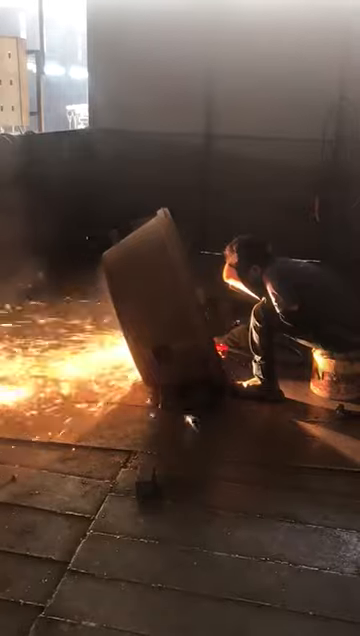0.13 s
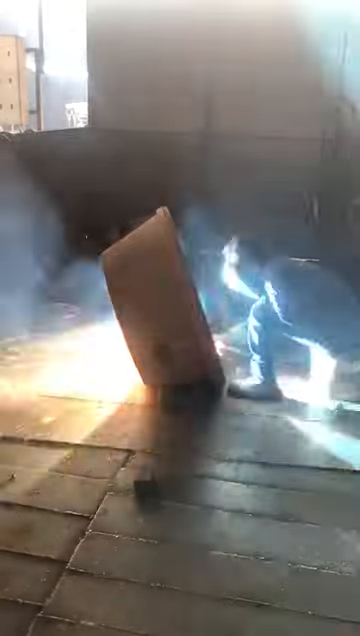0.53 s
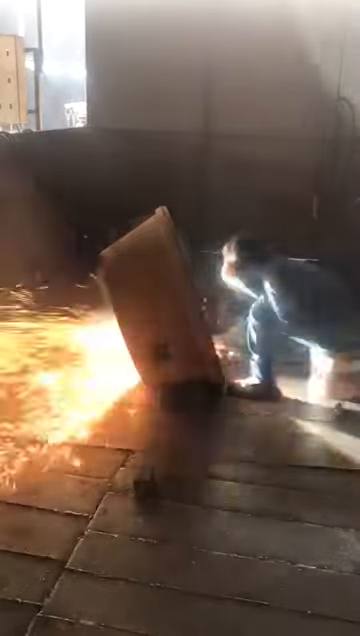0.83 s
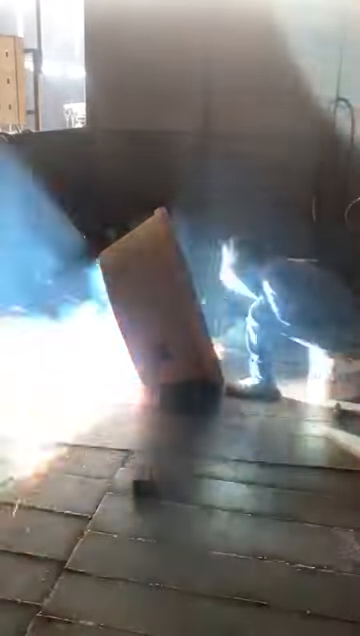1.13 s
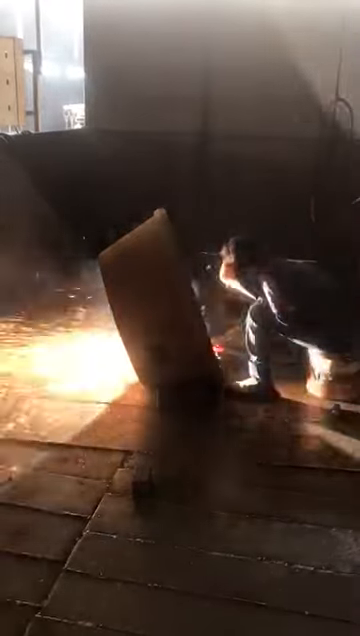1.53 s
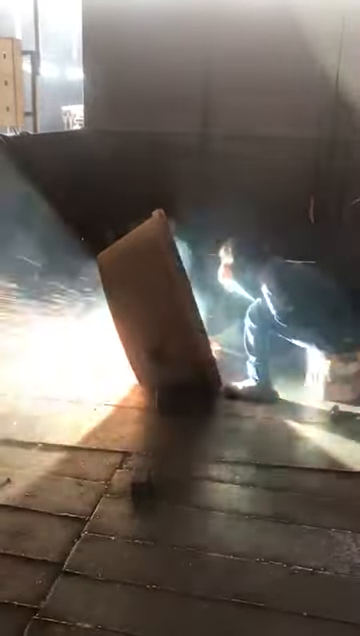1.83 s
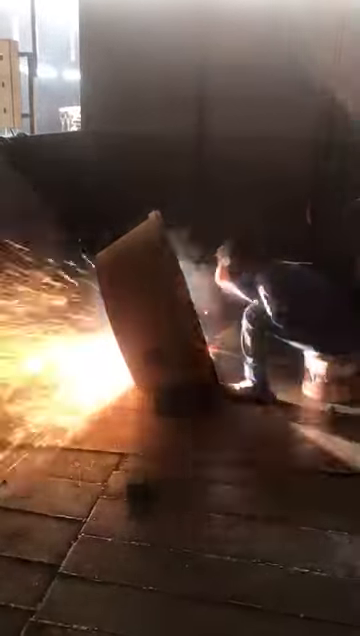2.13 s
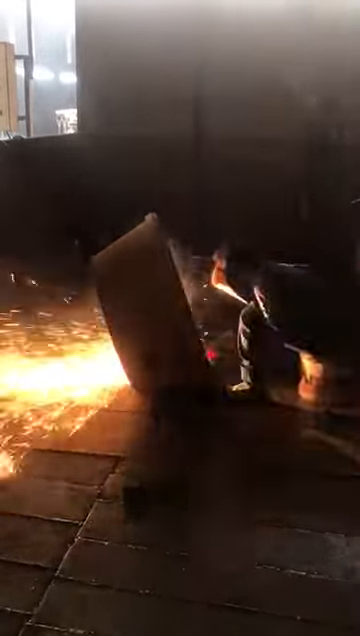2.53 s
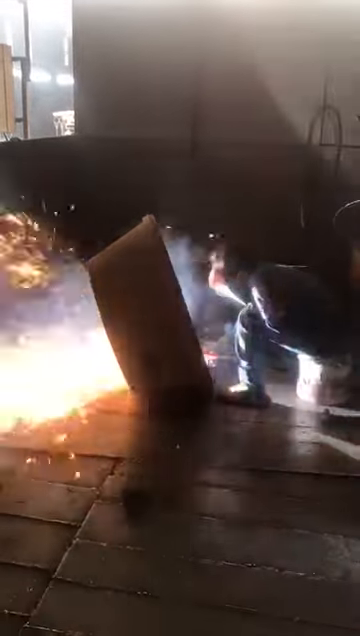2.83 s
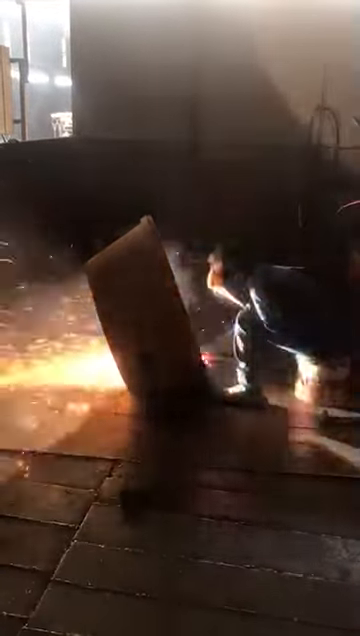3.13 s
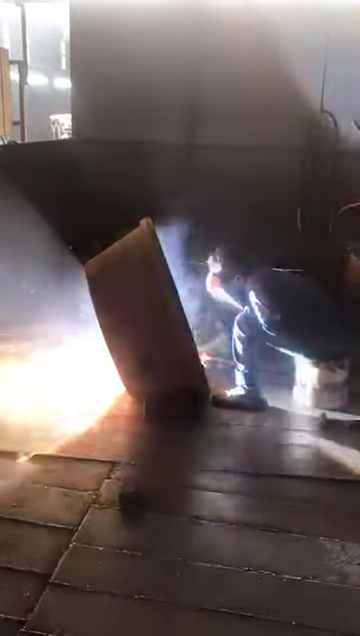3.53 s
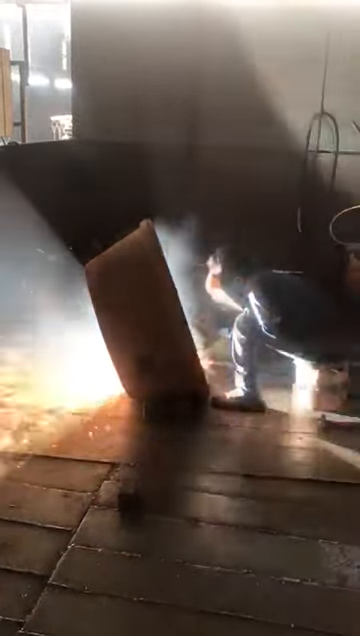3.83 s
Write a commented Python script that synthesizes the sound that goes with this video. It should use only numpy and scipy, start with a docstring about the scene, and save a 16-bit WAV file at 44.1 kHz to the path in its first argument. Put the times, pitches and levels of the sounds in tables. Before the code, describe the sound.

An electric arc gouges steel over a continuous hiss of compressed air, a few metres away in a workshop. The arc flares at about 0.3 seconds, then spits in irregular roaring bursts from 0.6 to 2.4, with small low thumps and faint brief rings near 1.9. After a lull it surges from 2.7 to 3.1 and again from 3.4 to 4 seconds, each burst leaving a short echo.

```python
"""A steel hall, with carbon arc gouging a few metres from a phone. A jet of compressed air hisses
throughout. Over a low steady burn the arc flares in irregular, spitting bursts, coloured by narrow
resonant peaks and the cut groove, and it thumps as it breaks or strikes. A few brief, narrow rings
poke out of the roar, and the hall smears each burst into a short tail."""
import sys
import numpy as np
from scipy import signal
from scipy.fft import rfft, irfft
from scipy.io import wavfile

SR = 44100
rng = np.random.default_rng(int(sys.argv[2]) if len(sys.argv) > 2 else 0)


def output_pcm(signal):
    """Save a mono or channel-first signal as 16-bit PCM at the path in sys.argv[1].

    Samples are clipped to [-1, 1] before scaling.
    """
    pcm = np.clip(np.atleast_2d(signal).T, -1, 1) * 32767
    wavfile.write(sys.argv[1], SR, np.round(pcm).astype(np.int16))


N = 175959

# Level rides for the air jet and the arc's steady burn: time_s, jet_db, burn_db
BED_LEVELS = [(.14, -23, -40), (.26, -24.5, -44), (.66, -21.5, -46), (.83, -21, -43), (1.19, -20.5, -32.5),
              (1.39, -22.5, -57), (1.62, -19.5, -40), (1.92, -21, -32), (2.11, -22.5, -45),
              (2.41, -20.5, -30.5), (2.46, -23, -43), (2.78, -21.5, -56), (2.93, -21.5, -26.5),
              (3.13, -20, -37), (3.41, -21.5, -34), (3.58, -24.5, -36), (3.62, -18.5, -37),
              (3.99, -20.5, -27.5)]
# Tone curve of the air jet: frequency_hz, gain_db
JET_EQ = [(60, -5), (150, -2.5), (300, -3.5), (430, -11.5), (1030, -10.5), (2300, -2.5), (6000, -4.5),
          (9000, -3), (11500, -1.5), (12000, -13)]
# Tone curve of the arc: frequency_hz, gain_db
ARC_EQ = [(40, -8.5), (100, -9.5), (220, -3.5), (430, -9.5), (1000, -10.5), (2200, -6.5), (4200, -1.5),
          (5000, -4), (7000, -5.5), (12000, -10)]
# Flares of the arc: peak_s, rise_ms, fall_ms, level_db, brightness_db, groove_ring_db
ARC_FLARES = [(0.275, 10.7, 11.8, -18.5, -1, -1), (0.626, 15.4, 15, -22.5, -5, 5),
              (0.713, 16.7, 14, -17, -6, 8), (0.758, 21, 27, -19, 1.5, 5), (0.87, 13, 30, -32, 9.5, 12),
              (0.913, 13, 17.6, -17, 0, 4), (1.014, 25, 21.5, -19.5, 3, 4), (1.142, 12, 14, -20, 6, 1),
              (1.187, 27, 5.8, -21, -12, 7), (1.229, 16, 23, -16.5, 1, 3), (1.3, 23, 26, -19.5, 0, 5),
              (1.366, 11, 23.4, -18.5, 2, -4), (1.575, 42, 17, -30.5, 9.5, 4),
              (1.703, 9.4, 18, -20.5, -2, 5), (1.788, 37, 60, -27, 7, 10), (1.899, 17, 20, -22.5, 1.5, 5.5),
              (1.968, 34, 27, -19, -6, 2), (2.03, 18, 5, -20.5, -2, -1), (2.062, 5.8, 20, -23.5, -1, 8),
              (2.118, 29, 17, -32, 11, 5), (2.193, 78, 14, -20.5, 0.5, 3.5), (2.306, 16.4, 38, -21, 0, 3),
              (2.76, 26, 16, -21, 3.5, 1), (2.83, 13.4, 12, -18, 0.5, -4), (2.88, 20, 15, -17.5, 3, 5),
              (2.928, 3.3, 6.1, -16, -15, -18), (2.957, 13, 9.8, -14, -6, 4.5),
              (3.0, 9.6, 28, -21.5, 2, -2), (3.047, 24, 27, -16.5, -2, 0), (3.465, 12, 20, -19.5, 0.5, 4.5),
              (3.526, 2, 5.3, -13.5, -17, 8), (3.543, 7.5, 15.5, -18, -2, 9),
              (3.62, 18, 16.6, -17.5, 0.5, -4), (3.656, 6, 7.4, -17.5, -7, 0), (3.7, 11, 21, -17.5, 0.5, 2),
              (3.815, 32, 23, -19.5, 0.5, -3)]
# Narrow resonant peaks that colour the arc's roar: pitch_hz, width_hz, gain_db
ROAR_RESONANCES = [(705.5, 11.3, 10.5), (732.6, 14, 9.5), (954, 39, 6.5), (1005, 45, 10.5), (1143, 84, 6),
                   (1850, 54, 3.5), (2040, 30, 8.5), (2154, 27, 7), (2490, 86, 3.5), (2773, 32, 8),
                   (3210, 330, 2)]
# Resonances of the cut groove, louder in some flares: pitch_hz, width_hz, gain_db
GROOVE_MODES = [(1600, 130, 6), (4510, 59, 2.5)]
# Low thumps of the arc breaking or striking: centre_s, level_db, pitch_hz
ARC_THUMPS = [(0.282, -16, 203), (0.63, -16, 212), (0.786, -16, 202), (.81, -23, 109), (.919, -17, 218),
              (1.03, -13.5, 200), (1.16, -20, 220), (1.187, -19, 160), (1.268, -17, 191), (1.295, -15, 250),
              (1.323, -18, 177), (1.39, -15, 193), (2.032, -17, 225), (2.306, -13, 201),
              (2.767, -14.5, 189), (2.837, -17, 220), (2.933, -14.5, 233), (2.968, -16, 230),
              (3.018, -16, 220), (3.043, -14, 200), (3.486, -17, 186), (3.54, -16, 199), (3.627, -14, 208),
              (3.917, -18, 238)]
# Brief narrow rings within the roar: start_s, length_s, pitch_hz, level_db
BRIEF_RINGS = [(1.886, 0.037, 1660, -17.5), (1.957, 0.04, 1610, -19), (1.932, 0.041, 650, -22.5),
               (3.79, 0.07, 692, -25)]

FREQS_HZ = np.fft.rfftfreq(N, 1 / SR)


def gain(db):
    """Decibels to amplitude."""
    return 10 ** (np.asarray(db) / 20)


def unit_rms(x):
    """Normalise to an rms of 1."""
    return x / np.sqrt(np.mean(x ** 2))


def equalise(x, curve, band):
    """Shape a sound with a tone curve and keep one band of it."""
    hz, db = np.array(curve).T
    curve_db = np.interp(np.log(FREQS_HZ + 1), np.log(hz), db)
    return irfft(rfft(x) * gain(curve_db) * band, N)


def wobble(rate_hz):
    """Smooth random modulation: noise low-passed at rate_hz, rms 1."""
    steps = np.repeat(rng.standard_normal(N // 16 + 1), 16)[:N]
    return unit_rms(signal.lfilter(*signal.butter(2, rate_hz, fs=SR), steps))


def resonate(x, hz, width_hz):
    """One resonance, unity gain at its centre."""
    return signal.lfilter(*signal.iirpeak(hz, hz / width_hz, fs=SR), x)


def air_jet(t, flicker_db=1.52, treble_db_per_db=0.24):
    """Compressed air hisses, each octave flickering on its own, brighter when it blows harder."""
    times, jet_db, _ = np.array(BED_LEVELS).T
    level_db = np.interp(t, times, jet_db)
    treble_db = treble_db_per_db * (level_db - level_db.mean())
    hiss = 0
    for octave in range(5, 15):  # bands centred near 2 ** octave Hz
        band = np.sqrt(np.clip(1 - abs(np.log2(FREQS_HZ + 1) - octave), 0, 1))
        air = equalise(rng.standard_normal(N), JET_EQ, band)
        hiss = hiss + air * gain(flicker_db * wobble(8.5) + (octave > 11) * treble_db)
    return unit_rms(hiss) * gain(level_db)


def arc(t, spits_per_s=4000, crossover_hz=2600, burn_treble_db=6.5, sputter_db=1.7):
    """Dense, uneven spits of plasma merge into a roar; body and treble ride the flares and the burn."""
    chance, size = rng.random((2, N))
    spits = (chance < spits_per_s / SR) * gain(-3 * np.log(size + 0.012))  # many small, a few loud
    crackle = unit_rms(spits * np.sign(rng.standard_normal(N)))
    roar = resonant_colour(crackle + rng.standard_normal(N), t)
    body = 1 / (1 + (FREQS_HZ / crossover_hz) ** 4)
    times, _, burn_db = np.array(BED_LEVELS).T
    out = 0
    for is_treble, band in ((False, body), (True, 1 - body)):
        burn_power = gain(np.interp(t, times, burn_db) + is_treble * burn_treble_db) ** 2
        envelope = np.sqrt(flare_power(t, is_treble) + burn_power)
        sputter = gain(sputter_db * wobble(68))
        out = out + unit_rms(equalise(roar, ARC_EQ, band)) * envelope * sputter
    return out


def resonant_colour(drive, t, mid_drift_db=4, shimmer_drift_db=6, shimmer_peaks=40):
    """Narrow midrange peaks and a fine high shimmer come and go; the groove follows the flares."""
    shimmer_hz = 3420 + 188.3 * (np.arange(shimmer_peaks) + 0.606 * rng.random(shimmer_peaks))
    drifts = [wobble(9) for _ in range(7)]
    mids = sum(resonate(gain(db + mid_drift_db * drifts[k % 7]) * drive, hz, width_hz)
               for k, (hz, width_hz, db) in enumerate(ROAR_RESONANCES))
    shimmer = sum(resonate(gain(0.5 + shimmer_drift_db * drifts[3 * k % 7]) * drive, hz, width_hz=14)
                  for k, hz in enumerate(shimmer_hz))
    peaks_s, *_, groove_ring_db = np.array(ARC_FLARES).T
    ring_db = np.interp(t, peaks_s, groove_ring_db)
    groove = sum(resonate(gain(db + ring_db) * drive, hz, width_hz) for hz, width_hz, db in GROOVE_MODES)
    return drive + mids + shimmer + groove


def flare_power(t, is_treble, treble_lead_s=0.004, steepness=2.3):
    """Each flare of the arc swells and dies away, its treble just ahead of its body."""
    power = 0
    for peak_s, rise_ms, fall_ms, level_db, brightness_db, _ in ARC_FLARES:
        offset_ms = (t - peak_s + is_treble * treble_lead_s) * 1000
        from_peak = np.where(offset_ms < 0, -offset_ms / rise_ms, offset_ms / fall_ms)
        swell = np.exp(-np.minimum(from_peak, 9) ** steepness)
        power = power + gain(level_db + is_treble * brightness_db) ** 2 * swell
    return power


def arc_thumps(t, sigma_s=0.0027):
    """The arc breaks or strikes: a couple of low swings of air, each thump at its own pitch."""
    out = 0
    for centre_s, level_db, pitch_hz in ARC_THUMPS:
        offset_s = t - centre_s
        envelope = np.exp(-np.clip(offset_s / sigma_s, -9, 9) ** 2 / 2)
        out = out - gain(level_db) * np.sin(2 * np.pi * pitch_hz * offset_s) * envelope
    return out


def brief_rings(t, q=28, fade_s=0.0045):
    """Noise sings on one narrow resonance for a moment."""
    out = 0
    for start_s, length_s, pitch_hz, level_db in BRIEF_RINGS:
        gate = np.clip(np.minimum(t - start_s, start_s + length_s - t) / fade_s, 0, 1)
        tone = unit_rms(resonate(rng.standard_normal(N), pitch_hz, pitch_hz / q))
        out = out + gate * tone * gain(level_db)
    return out


def hall_reverb(send, t60_s=0.5, predelay_s=0.012, damping_hz=4400):
    """The hall's reflections blur into a short tail with a softened top."""
    t = np.arange(SR) / SR
    tail = rng.standard_normal(SR) * gain(-60 * t / t60_s) * (t > predelay_s)
    tail = signal.lfilter(*signal.butter(1, damping_hz, fs=SR), tail)
    return signal.fftconvolve(send, tail / np.sqrt(np.sum(tail ** 2)))[:N]


def scene(thump_send_db=-4.5, hall_return_db=-11):
    """The mono mix: roar and thumps with their hall tail, over a dry bed of air hiss."""
    t = np.arange(N) / SR
    roar = arc(t) + brief_rings(t)
    thumps = arc_thumps(t)
    hall = hall_reverb(roar + gain(thump_send_db) * thumps)
    return (roar + thumps + gain(hall_return_db) * hall + air_jet(t))[None]


def record(dry, silence_s=0.0845, dip_db=-3, low_cut_hz=50, high_cut_hz=12000):
    """The phone opens after a short silence: three treble dips, thin sub-bass, soft peaks, top cut off."""
    dips_db = sum(dip_db * np.exp(-((FREQS_HZ - hz) / 420) ** 2) for hz in (4810, 7660, 10480))
    dipped = irfft(rfft(dry) * gain(dips_db), N)
    thinned = signal.lfilter(*signal.butter(3, low_cut_hz, "high", fs=SR), dipped)
    fade_in = np.clip((np.arange(N) / SR - silence_s) / 0.001, 0, 1)
    high_cut = signal.ellip(13, 1, 100, high_cut_hz, fs=SR, output="sos")
    return signal.sosfilt(high_cut, np.tanh(thinned * fade_in))


dry = scene()
out = record(dry)
output_pcm(out)
```